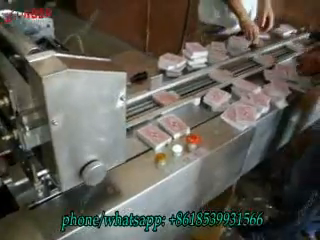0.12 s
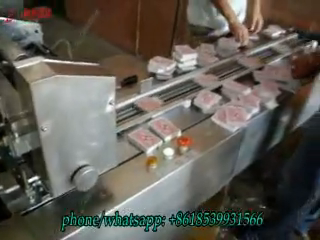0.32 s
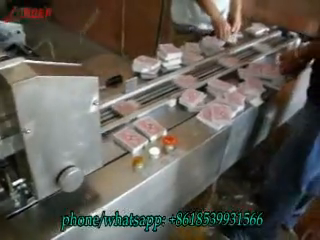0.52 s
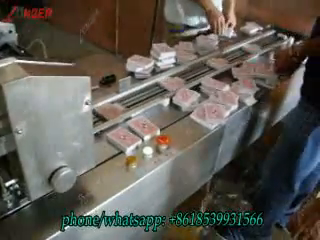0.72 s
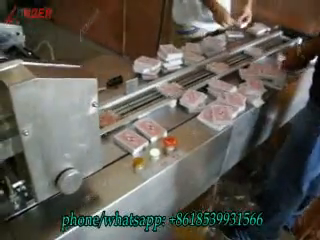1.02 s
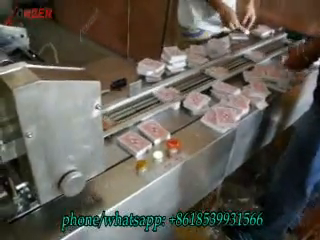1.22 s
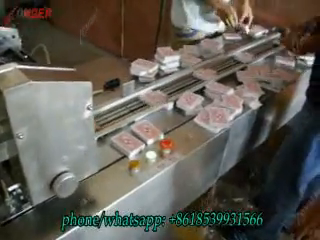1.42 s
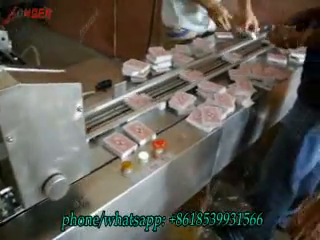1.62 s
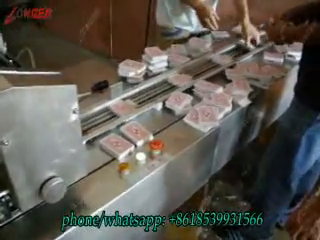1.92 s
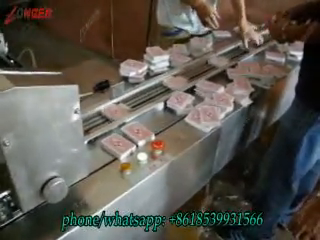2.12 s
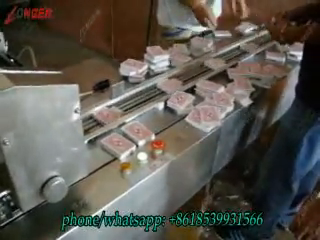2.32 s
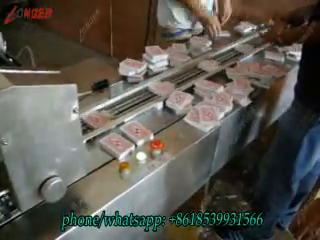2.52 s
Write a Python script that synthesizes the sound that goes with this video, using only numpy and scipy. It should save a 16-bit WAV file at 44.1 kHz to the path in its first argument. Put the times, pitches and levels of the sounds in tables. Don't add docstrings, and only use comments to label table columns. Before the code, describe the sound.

A wrapping machine knocks hard on hollow steel, with ringing clacks and ticks over motor drone

```python
import sys
import numpy as np
from scipy import signal
from scipy.fft import rfft, irfft
from scipy.io import wavfile
from scipy.ndimage import uniform_filter1d

SR = 44100
rng = np.random.default_rng(int(sys.argv[2]) if len(sys.argv) > 2 else 0)


def attenuation_scalar(level_db):
    decades = np.asarray(level_db, float) / 20
    return 10 ** decades


def digitize_waveform(pressure):
    field = np.atleast_2d(pressure).T
    bounded = np.clip(field, -1, 1)
    quanta = np.round(bounded * 32767).astype(np.int16)
    wavfile.write(sys.argv[1], SR, quanta)


N = 119070


def conv(x, h):
    return signal.fftconvolve(x, h)[:N]


def shaped(x, gain):
    hz = np.arange(len(x) // 2 + 1) * SR / len(x) + 1e-3
    return irfft(rfft(x) * gain(hz), len(x))


def bump(f, hz, octaves):
    return np.exp(-0.5 * (np.log2(f / hz) / octaves) ** 2)


def unit(x):
    return x / np.sqrt(np.mean(x ** 2))


def walk(rate):
    k = int(SR / rate)
    steps = np.repeat(rng.standard_normal(N // k + 1), k)
    return unit(uniform_filter1d(uniform_filter1d(steps, k), k)[:N])


def add(x, s, y):
    i = int(s * SR)
    x[i:i + len(y)] += y[:N - i]


def ring(modes, rattle=0.0, rattle_hz=40.0, size=SR):
    t = np.arange(size) / SR
    hz, db, t60 = np.array(modes, float).T[:, :, None]
    k = int(SR / rattle_hz)
    noise = rng.standard_normal((2, len(modes), size))
    real, imag = uniform_filter1d(uniform_filter1d(noise, k), k // 2) * np.sqrt(k / 2)
    onset = np.clip(t / 0.022, 0, 1)
    waver = (1 + rattle * (real + 1j * imag) * onset) / np.hypot(1, rattle)
    modal = (waver * np.exp(2j * np.pi * hz * t - np.log(1000) * t / t60)).imag
    sign = (-1) ** np.arange(len(modes))[:, None]
    return np.sum(attenuation_scalar(db) * sign * modal, axis=0)


def crack(db, decay_s, hz, octaves=0.67):
    t = np.arange(4096) / SR
    contact_s = 0.0012 * hz / 1000
    rise = np.sin(np.pi / 2 * np.clip(t / contact_s, 0, 1)) ** 2
    noise = unit(shaped(rng.standard_normal(4096), lambda f: bump(f, hz, octaves)))
    return attenuation_scalar(db) * noise * rise * np.exp(-t / decay_s)


# (frequency [Hz], density [dB per Hz])
DRONE_COLOUR = [(12, -58), (20, 7.5), (54, 0.5), (76, -1.5), (156, 1), (375, -5.5), (788, -9), (1110, -23),
                (4370, -31), (5680, -55), (9610, -120)]
# (frequency [Hz], width [Hz], level [dB])
HOUSING = [(325, 20, 9), (446, 180, -0.5), (896, 67, 4), (1150, 450, 13), (2663, 1800, 12.5),
           (3670, 100, 2)]


def drone():
    hz, db = np.array(DRONE_COLOUR).T

    def colour(f):
        housing_db = sum(d / (1 + (2 * (f - c) / w) ** 2) for c, w, d in HOUSING)
        return attenuation_scalar(np.interp(np.log(f), np.log(hz), db) + housing_db)

    swell_db = -0.5 * walk(6.2)
    out = np.zeros(N)
    for c in 20 * 2 ** np.arange(0, 8.6, 0.5):
        flicker_db = 2 * walk(14)
        band = shaped(rng.standard_normal(N), lambda f: colour(f) * bump(f, c, 0.33))
        out += attenuation_scalar(swell_db + flicker_db) * band
    return attenuation_scalar(-27) * unit(out)


def chain():
    links_per_s, spread_db, loudest = 230, 2.5, 0.04
    r = rng.random((N, 2))
    hits = r[:, 0] < links_per_s / SR
    links = hits * attenuation_scalar(-spread_db * np.log(r[:, 1] + loudest))
    guard = [(886, 17.5, 0.01), (1150, -15, 0.012), (2580, -23, 0.015), (3440, -34, 0.012), (426, 0.5, 0.017)]
    return attenuation_scalar(-38) * unit(conv(links, ring(guard, size=4096)))


# (time [s], level [dB], ring [Hz], broad crack relative to the tick [dB])
TICKS = [(0.1013, -17, 2830, -8.5), (0.1448, -23.5, 2090, -12), (0.5207, -28, 2130, 1),
         (0.5473, -22.5, 2940, -8.5), (0.5556, -36, 2370, -24), (0.5781, -11.5, 2060, -16.5),
         (0.6114, -16, 2850, -6.5), (1.0909, -25, 2080, -11.5), (1.154, -15.5, 2565, -13.5),
         (1.1801, -20, 2650, -26), (1.49, -28, 2550, -4.5), (1.5319, -22, 2270, -11),
         (1.6242, -33, 2630, -3.5), (1.7973, -15, 3430, -13), (2.0064, -20.5, 2440, -18.5),
         (2.0174, -19, 3070, -23), (2.149, -37.5, 2120, 2), (2.2114, -27, 2270, -4),
         (2.2322, -20, 2785, -7), (2.2492, -28.5, 2880, 3.5), (2.2944, -23.5, 2300, -8.5)]


def ticks():
    out = np.zeros(N)
    for s, db, hz, broad_db in TICKS:
        add(out, s, attenuation_scalar(db - 7) * ring([(hz, 0, 0.022)], size=4096))
        scrape = crack(db - 21, 0.018, hz, 0.34)
        add(out, s, scrape + crack(db + broad_db, 0.012, 2300, 0.7))
    return out


# (time [s], level [dB], centre [Hz])
THUDS = [(0.109, -17, 1150), (0.574, -11.5, 433), (0.612, -11.5, 457), (1.155, -14, 584),
         (1.794, -12, 1174), (2.02, -14, 439), (2.149, -7, 610), (2.164, -10, 440), (2.266, -11.5, 426),
         (2.298, -13, 980)]


def thuds():
    out = np.zeros(N)
    for s, db, hz in THUDS:
        add(out, s, crack(db - 8, 0.1 / 7, hz, 0.5))
    return out


# (time [s], level [dB])
LATCHES = [
    (.5962, -12),
    (2.2807, -12),
]


def latches():
    hz, t60_s = 2490, 0.03
    out = np.zeros(N)
    for s, db in LATCHES:
        add(out, s, attenuation_scalar(db) * ring([(hz, 0, t60_s), (hz * 0.9, -6, t60_s)], size=4096))
        add(out, s, crack(db - 14.5, 0.017, 3000, 0.35))
    return out


# (time [s], level [dB])
CLACKS = [
    (.697, -12),
    (2.387, -11.5),
]
# (frequency [Hz], level [dB], T60 [s])
LEVER = [(280, -13, .18), (345, -8, .22), (438, 1, .19), (885, -17, .2), (965, -14, .2), (1108, 0, .19),
         (1152, -7, .12), (1510, -15, .1), (2300, -20, .12), (2880, -22, .12), (3260, -22, .1)]
# (frequency [Hz], level [dB], T60 [s])
LEVER_SMACK = [(1085, 9, .04), (410, 3, .04)]


def clacks():
    rattle, rattle_hz = 0.5, 60
    out = np.zeros(N)
    for s, db in CLACKS:
        add(out, s, attenuation_scalar(db) * ring(LEVER, rattle, rattle_hz))
        add(out, s + 0.019, attenuation_scalar(db - 5.5) * ring(LEVER, rattle, rattle_hz))
        add(out, s, attenuation_scalar(db) * crack(-7, 0.0095, 4200))
        add(out, s, attenuation_scalar(db) * ring(LEVER_SMACK, size=4096))
    return out


# (frequency [Hz], level [dB], T60 [s])
CABINET = [(133, -13.5, 0.45), (218.2, -13.5, 0.21), (271.5, -5.5, 0.36), (309.2, -3.5, 0.36),
           (351.8, 1, 0.63), (431.6, -13, 0.66), (541, -10.5, 0.46), (625.7, -11.5, 0.29),
           (788, -13.5, 0.66), (934, -10, 0.44), (1095, -7.5, 0.44), (1236, -11, 0.17), (1550, -30, 0.15),
           (2540, -25, 0.12)]


def cabinet(bright_db, boom_db):
    modes = []
    for hz, db, t60 in CABINET:
        tilt_db = bright_db if hz > 600 else boom_db if hz < 250 else 0
        modes.append((hz, db + tilt_db, t60))
    return ring(modes, rattle=4, rattle_hz=150)


# (time [s], level [dB], brightness [dB], boom [dB], second blow delay [s])
KNOCKS = [
    (0.2417, 12.5, -0.5, -0.5, .012),
    (1.9079, 11, -7.5, 5.5, 0.016),
]


def knocks():
    out = np.zeros(N)
    for s, db, bright_db, boom_db, late in KNOCKS:
        add(out, s - 0.0035, attenuation_scalar(db - 22) * crack(0, 0.0041, 490))
        add(out, s, attenuation_scalar(db - 12.5) * cabinet(bright_db - 1, boom_db))
        add(out, s + late, attenuation_scalar(db - 23.5) * cabinet(bright_db + 10.5, boom_db))
        thump = [(282.1, -8, 0.078), (194.4, boom_db - 16, 0.057), (81.5, boom_db - 28, 0.1)]
        add(out, s, attenuation_scalar(db) * ring(thump, size=16384))
        add(out, s, attenuation_scalar(db) * crack(-14.5, 0.009, 800, 0.74))
        add(out, s + late, attenuation_scalar(db + bright_db) * crack(-24.5, 0.018, 1600))
    return out


# (frequency [Hz], T60 [s])
ROOM_T60 = [(100, 1.6), (300, 1.52), (1000, 1.17), (2500, 2.1), (4500, 0.26)]


def room(x):
    t = np.arange(SR) / SR
    hz, t60 = np.array(ROOM_T60).T
    tail = np.zeros(SR)
    for c in 60 * 2.0 ** np.arange(7):
        band_t60 = np.interp(np.log(c), np.log(hz), t60)
        band = shaped(rng.standard_normal(SR), lambda f: bump(f, c, 0.82))
        tail += band * np.exp(-np.log(1000) * t / band_t60)
    fade_in = np.clip(t / 0.0039 - 1, 0, 1)
    return conv(x, attenuation_scalar(-23.5) * 0.08 * tail * fade_in)


def scene():
    parts = knocks() + clacks() + latches() + ticks() + thuds() + chain()
    return (parts + room(parts) + drone())[None]


def top_cut(x):
    return signal.sosfilt(signal.butter(12, 15800, fs=SR, output="sos"), x)


def record(dry):
    edge_hz, edge_width_hz = 4350, 520
    ceiling, knee = 0.75, 9
    smear_s = 0.007

    def low(f):
        slope = np.clip((f - edge_hz) / edge_width_hz * 2, -50, 50)
        return 1 / (1 + np.exp(slope)) * (f < 5050)

    x = shaped(dry[0], low)
    over = x / (1 + np.abs(x / ceiling) ** knee) ** (1 / knee) - x
    splatter = shaped(over, lambda f: (1 - low(f)) * attenuation_scalar(1) * bump(f, 8200, 0.46))
    from_centre = np.abs(np.arange(2048) - 1024)
    smear = rng.standard_normal(2048) * np.exp(-from_centre / smear_s / SR * 2)
    splatter = signal.fftconvolve(splatter, smear / np.sqrt(np.sum(smear ** 2)), mode="same")
    hiss = attenuation_scalar(-100) * rng.standard_normal(N)
    mix = x + shaped(over, low) + splatter + hiss
    return top_cut(mix[None] + 0.0058)


dry = scene()
out = record(dry)
digitize_waveform(out)
```